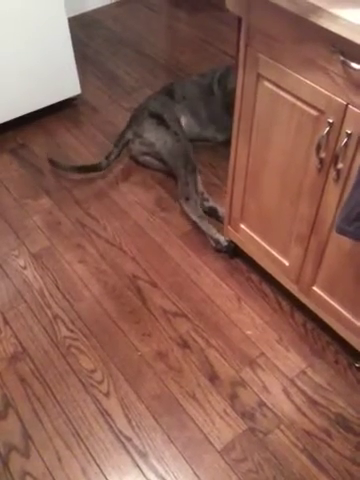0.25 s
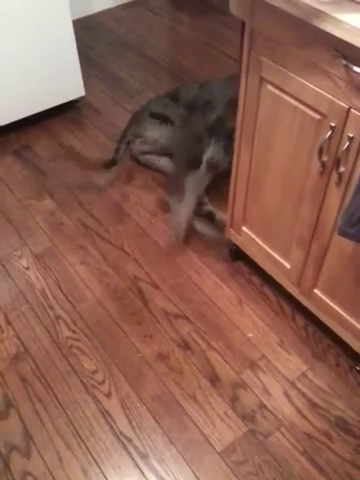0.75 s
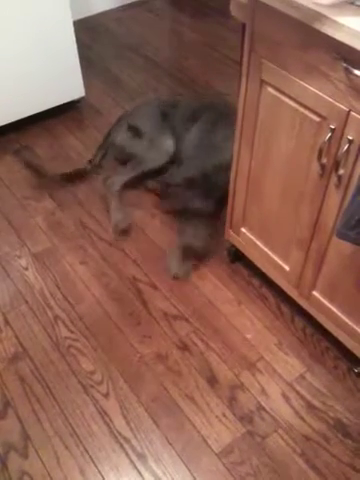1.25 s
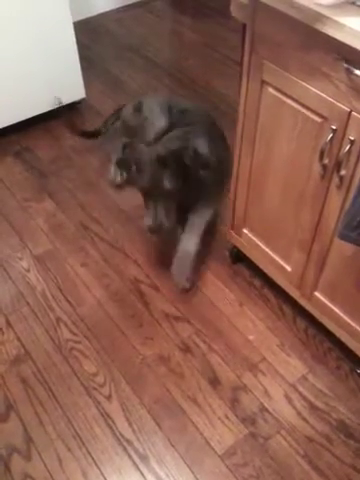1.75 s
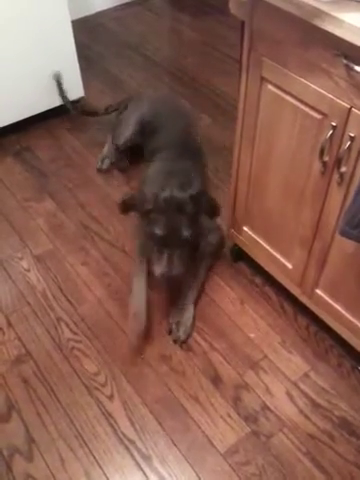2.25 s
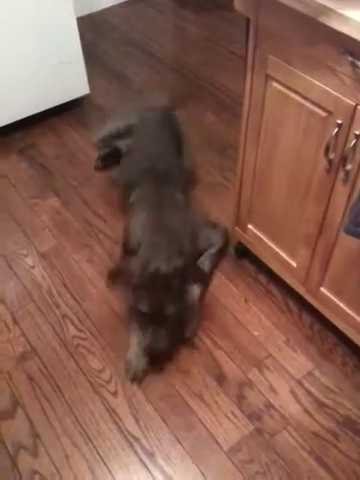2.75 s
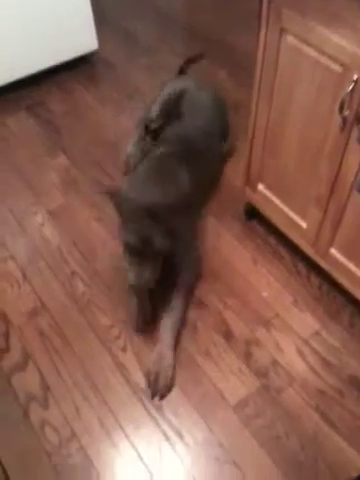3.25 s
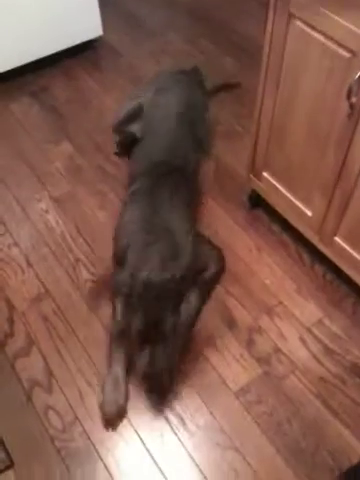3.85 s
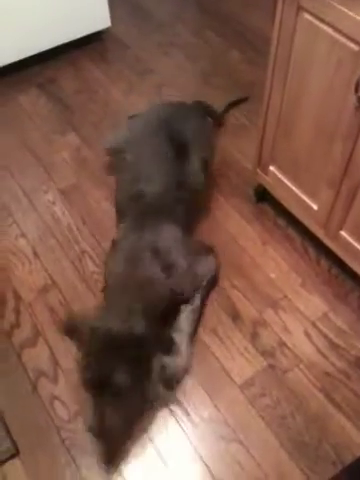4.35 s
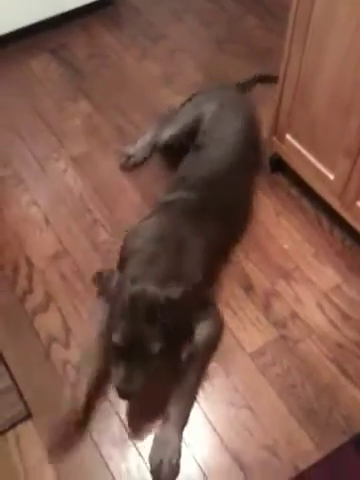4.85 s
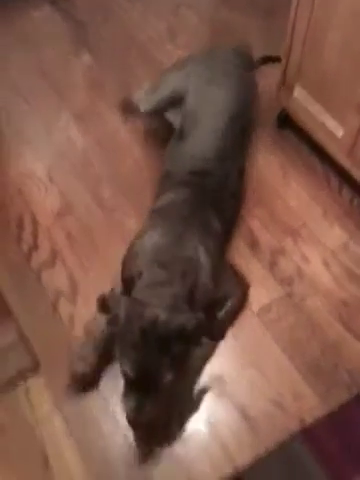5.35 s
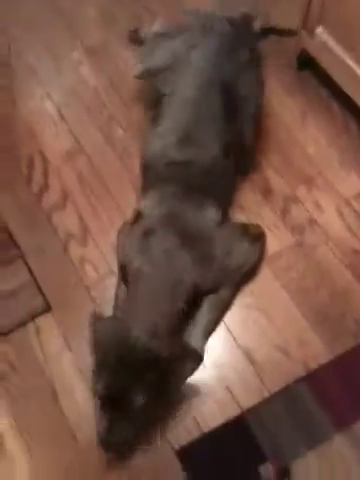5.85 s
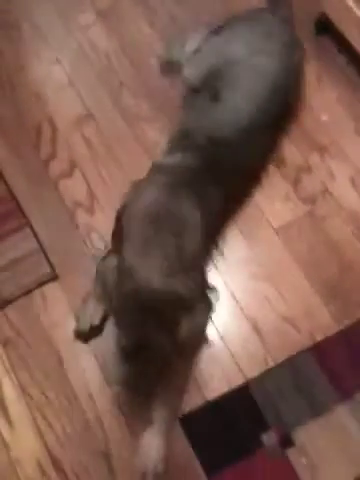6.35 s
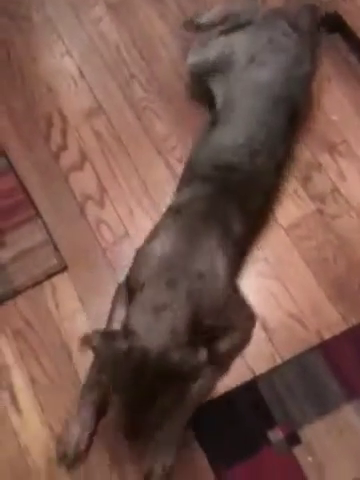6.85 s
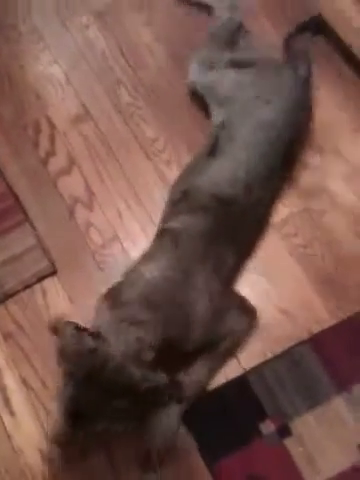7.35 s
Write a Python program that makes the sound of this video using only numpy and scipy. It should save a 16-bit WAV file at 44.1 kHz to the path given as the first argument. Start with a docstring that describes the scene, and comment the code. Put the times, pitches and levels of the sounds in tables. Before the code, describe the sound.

In a small hard-walled kitchen with a faint fan-like appliance hum, a large dog drags itself over hardwood. Soft rubs and a low thump lead to a rapid clatter of claws, a short lull, then bursts of scraping, hollow knocks and belly drags. One especially sharp claw crack lands around five seconds; lighter skids and rubbing follow. Mono, close small microphone, thin in the bass, with short room echoes.

```python
"""Dog crawling on a kitchen floor

A large dog crawls across hardwood boards in a small, hard-walled room, over the faint hum of an appliance.
Claws are brief chattering skids and snaps through board resonances; elbows and paws are damped low tones.
Coat and pads are coloured noise that swells with each stroke and pull, with gritty ticks from the grain.
Decaying noise answers contacts and sliding as the room; the appliance is fan noise and wavering tones."""
import sys
import numpy as np
from scipy import signal
from scipy.fft import rfft, irfft
from scipy.io import wavfile
from scipy.ndimage import uniform_filter1d

SR = 44100
rng = np.random.default_rng(int(sys.argv[2]) if len(sys.argv) > 2 else 0)


def log_audio(samples):
    """Write samples as a 16-bit WAV file to the path given in sys.argv[1]."""
    # one column per channel
    frames = np.atleast_2d(samples).T
    # limit to full scale, then quantise
    limited = np.clip(frames, -1, 1)
    pcm = np.round(limited * 32767).astype(np.int16)
    wavfile.write(sys.argv[1], SR, pcm)


N = 334719
TIME = np.arange(N) / SR


def undb(db):
    """Decibels to gain."""
    return 10 ** (np.asarray(db) / 20)


def unit(x):
    """Scale to rms 1."""
    return x / np.sqrt(np.mean(x ** 2))


def along(points, hz):
    """Read (Hz, value) points on a log-frequency axis."""
    f, value = np.transpose(points)
    return np.interp(np.log(np.maximum(hz, 1)), np.log(f), value)


def colour(x, points):
    """Give a sound a spectrum that falls away beyond its end points."""
    hz = np.maximum(np.fft.rfftfreq(len(x), 1 / SR), 1)
    below, above = hz / points[0][0], points[-1][0] / hz
    skirts = np.minimum(1, np.minimum(below, above)) ** 2
    return irfft(rfft(x) * undb(along(points, hz)) * skirts, len(x))


def causal(gain):
    """The most compact (minimum-phase) impulse response with this gain per frequency."""
    cepstrum = irfft(np.log(gain + 1e-9))
    half = len(cepstrum) // 2
    # fold the half before time zero onto the half after it
    cepstrum[1:half] *= 2
    cepstrum[half + 1:] = 0
    return irfft(np.exp(rfft(cepstrum)))


def walk(rate):
    """A smooth random wander with rms 1, heading for a new value `rate` times a second."""
    k = int(SR / rate)
    steps = np.repeat(rng.standard_normal(N // k + 1), k)
    return unit(uniform_filter1d(steps, k)[:N])


def add(out, s, x):
    """Mix a sound in at a time in seconds."""
    place = out[max(int(s * SR), 0):][:len(x)]
    place += x[:len(place)]


def kitchen(air_db=-58, waver_db=3.0, drift_rad=0.23):
    """An appliance runs: soft fan noise and a few low tones that waver in level and phase."""
    # Spectrum of the fan noise. Each row: frequency in Hz, relative density in dB.
    air_colour = [(30, -3), (80, -16), (140, -10), (180, -1), (400, 1), (600, -2.5), (800, -8), (1100, -14),
                  (1500, -11.5), (2550, -16.5), (3200, -26.5), (7500, -28.5), (10000, -31.5), (15800, -32)]
    # Tones of the hum. Each row: frequency in Hz, level in dB rms ahead of the waver and the microphone.
    hum_tones = [(100, -86), (120, -76), (198, -80), (247, -73), (298, -66), (351, -69)]
    air = unit(colour(rng.standard_normal(N), air_colour)) * undb(air_db)
    hum = np.zeros(N)
    for hz, db in hum_tones:
        level = undb(db + waver_db * walk(6.4))
        hum += level * np.sin(2 * np.pi * hz * TIME + drift_rad * walk(6))
    return air + np.sqrt(2) * hum  # a sine of peak sqrt(2) has rms 1


def room_tail(build_s, size=20000):
    """Diffuse echoes from one spot on the floor, energy 1; each band dies at its own pace."""
    # Reverberation of the room. Each row: frequency in Hz, time to fall by 60 dB in seconds.
    decay_times = [(200, 0.34), (800, 0.63), (2000, 0.58), (5000, 0.37), (14000, 0.39)]
    t, hz = TIME[:size], np.fft.rfftfreq(size, 1 / SR)
    noise, tail = rfft(rng.standard_normal(size)), 0
    for f, t60 in decay_times:
        # crossfading bands: 1 at this frequency, 0 at the others
        band = along([(g, float(g == f)) for g, _ in decay_times], hz)
        tail = tail + irfft(noise * band) * np.exp(-np.log(1000) * t / t60)
    tail = tail * (1 - np.exp(-t / build_s))
    return tail / np.linalg.norm(tail)


def swells(moves):
    """Each move speeds up and slows down in a bell shape; one envelope per level column."""
    centre, spread_s, *levels = np.transpose(moves)
    coarse = TIME[::64]
    bells = np.exp(-.5 * ((coarse - centre[:, None]) / spread_s[:, None]) ** 2)
    # overlapping moves add in power
    return [np.sqrt(np.interp(TIME, coarse, undb(db) ** 2 @ bells)) for db in levels]


def scratches(per_second=320, spread_db=1.5, grit_hz=3400, grit_db=7):
    """Claw tips trip over the wood grain: gritty ticks of uneven size, rms 1."""
    trips = rng.random(N) < per_second / SR
    grit = [(grit_hz / 3, -grit_db), (grit_hz, 0), (2 * grit_hz, -2 * grit_db)]
    return unit(colour(trips * undb(spread_db * rng.standard_normal(N)), grit))


def sliding(rub_db=-2, hiss_db=-0.5, drag_db=-2, grain_db=3, flutter_db=0.63, scratch_db=-7, wet_db=-4):
    """Each stroke swells and fades; hair and pads catch on the grain in countless tiny slips."""
    # A leg sweeps over the floor. Each row: time of the fastest point in seconds, spread of the bell
    # in seconds, pad rub in dB, coat hiss in dB; both levels ahead of the trims above.
    strokes = [(0.37, 0.052, -68, -77), (0.92, 0.02, -71, -68.5), (1.11, 0.039, -59, -64.5),
               (1.38, 0.069, -61.5, -67.5), (1.63, 0.072, -59, -66.5), (1.95, 0.011, -62, -78),
               (2.41, 0.025, -62, -89), (2.76, .08, -69, -76), (2.97, 0.047, -61.5, -75),
               (3.085, 0.026, -53, -57.5), (3.30, 0.021, -60, -63.5), (3.89, 0.0085, -60, -69),
               (4.00, 0.092, -68.5, -75), (4.17, 0.045, -53, -68.5), (4.51, 0.058, -55.5, -59),
               (4.68, 0.1, -61.5, -66.5), (5.27, 0.039, -63, -73), (5.42, 0.045, -61, -70.5),
               (5.80, 0.048, -57, -65), (6.15, 0.077, -62, -66), (6.33, 0.059, -63, -65),
               (6.55, 0.046, -61, -69), (6.88, .09, -65, -74), (7.48, 0.16, -62, -69.5)]
    # The dog hauls its belly forward. Each row: time of the fastest point in seconds, spread of the bell
    # in seconds, drag in dB ahead of its trim.
    pulls = [(0.92, 0.039, -61.5), (1.62, 0.32, -59.5), (2.41, 0.036, -60), (3.30, 0.026, -56),
             (4.18, 0.15, -56), (4.68, 0.052, -47), (5.30, .08, -62.5), (5.80, 0.12, -56.5),
             (6.14, 0.087, -50.5), (6.90, 0.75, -58.5)]
    # Spectra of pad rub, coat hiss and belly drag. Each row: frequency in Hz, relative density in dB.
    rub_colour = [(700, -12), (1200, -11), (1750, 0), (2600, -1.5), (3500, -13), (5000, -17.5), (7000, -22)]
    hiss_colour = [(3000, -24), (4500, -7), (5600, -3.5), (7400, 0.5), (9500, -7.5), (12500, -3),
                   (15800, -10.5)]
    drag_colour = [(150, -11.5), (300, 2.5), (450, 4), (800, 2.5), (1200, -5.5), (2000, -9.5)]
    rub, hiss, drag = swells(strokes) + swells(pulls)
    out = rub * undb(scratch_db) * scratches()
    layers = (rub, rub_colour, rub_db), (hiss, hiss_colour, hiss_db), (drag, drag_colour, drag_db)
    for swell, spectrum, db in layers:
        slips = rng.standard_normal(N) * undb(grain_db * walk(4000))
        out = out + swell * undb(db) * unit(colour(slips, spectrum))
    # the dog's weight presses unevenly
    out = out * undb(flutter_db * walk(35))
    echoes = signal.fftconvolve(out, room_tail(build_s=0.0013))[:N]
    return out + undb(wet_db) * echoes


def board_modes(hz, spacing_hz=170, depth_db=3.5, merge_hz=4000):
    """The floor's resonances plus those of one spot, in dB; the spot's own fade out in the treble."""
    # Resonances that the whole floor shares. Each row: frequency in Hz, width in Hz, height in dB.
    floor_modes = [(1580, 97, 3.5), (1773, 35, 6.5), (1980, 64, 5), (3810, 57, 0)]
    shared = sum(db / (1 + (2 * (hz - f) / width) ** 2) for f, width, db in floor_modes)
    knots = np.arange(160) * spacing_hz
    local = depth_db * np.interp(hz, knots, rng.standard_normal(len(knots)))
    return shared + local / (1 + (hz / merge_hz) ** 2)


def skid(skid_s, snap_db, size=1024):
    """A claw touches, chatters ever harder, snaps down and settles; energy 1."""
    u = TIME[:size] / max(skid_s, 1 / SR)  # the bite is hardest near u = 1
    envelope = (u ** 2 + 0.06) * np.exp(-2 * u)
    slips = rng.standard_normal(size) * envelope
    # the slips are so brief that they favour no pitch: flatten the spectrum, keep the phases
    slips = irfft(np.exp(1j * np.angle(rfft(slips)))) * envelope ** .25
    slips = slips / np.linalg.norm(slips)
    slips[np.argmax(envelope)] += undb(snap_db)
    return slips / np.linalg.norm(slips)


def toes(spread_s=0.022, toe_db=-16, count=3, size=2048):
    """The other claws of the paw follow the first, lightly and unevenly."""
    out = np.zeros(size)
    lags, chances = rng.uniform(.15, 1, count), rng.standard_normal(count)
    for lag, chance in zip(lags, chances):
        add(out, lag * spread_s, undb(toe_db + 2 * chance) * skid(skid_s=0.00089, snap_db=-0.23))
    return out


def judders(scatter_db=5, fade_db=3, count=7, edge_db=-8.5, mid_spot_hz=1350):
    """Stick and slip: each judder is a handful of uneven strikes that tend to weaken as the paw slows."""
    # A paw loses its grip and judders over the boards. Each row: start in seconds, length in seconds,
    # middle level in dB ahead of the claw gain, woody knock in dB.
    slides = [(1.488, 0.075, -38.5, -15.5), (1.643, .10, -34, -6.5), (3.188, 0.041, -48.5, 9.5),
              (4.446, .02, -46.5, 13), (4.688, .035, -47, 15), (5.801, 0.032, -40, -1),
              (6.153, 0.038, -42, -4.5), (6.90, .018, -52.5, 13), (7.464, 0.038, -52, -8)]
    strikes = []
    for s, length_s, db, knock_db in slides:
        for k, (late, force, spot) in enumerate(rng.random((count, 3))):
            part = (k + late) / count
            level_db = db + scatter_db * (force - .5) - fade_db * (part - .5)
            spot_hz = mid_spot_hz * 2 ** (spot - .5)
            strikes.append((s + length_s * part, level_db, knock_db, edge_db, spot_hz))
    return strikes


def claws(gain_db=23.0, knock_hz=1300, edge_hz=4800, low_hz=400, spot_db=5.0, spot_width_hz=260,
          ring_s=0.0064, ring_db=-7, room_db=-0.73, size=2048):
    """Each strike excites the hard board surface; a brief ring and the room's echoes follow, overlapping."""
    # Single claw strikes. Each row: time of the snap in seconds, level in dB ahead of the gain,
    # woody knock in dB, bright edge in dB, pitch of the struck spot in Hz.
    single_strikes = [ (0.863, -38, -9.5, -7, 1530), (1.250, -39.5, -8.5, -12, 2380),
                      (1.500, -33.5, -3, -12, 3260), (1.637, -30.5, -12.5, -5, 2380),
                      (1.644, -26, -4.5, -6.5, 2000), (1.677, -26, -10.5, -8.5, 1510),
                      (1.712, -27.5, -12.5, -21, 2650), (1.911, -29.5, -12.5, -1.5, 1720),
                      (1.923, -25, -2.5, -4, 3300), (1.965, -28, -16.5, -6, 1690),
                      (3.17, -36.5, 6.5, -20, 2200), (3.302, -28.5, -12.5, -4, 3600),
                      (3.338, -37.5, -4, -26, 1650), (3.450, -31.5, -6.5, -2, 1980),
                      (4.182, -35.5, -18, -7, 3640), (4.441, -26, -5, -33, 1810),
                      (4.631, -26, -18.5, -2, 2400), (4.652, -29.5, -14.5, -3, 1780),
                      (4.912, -37, 3.5, -9.5, 1380), (5.009, -40, 4.5, -3, 1000),
                      (5.023, -19.5, -12.5, -10.5, 2050), (5.184, -46, 2.5, -3, 1670),
                      (5.789, -29, -0.5, -14, 2170), (5.837, -27.5, -18, -9.5, 2180),
                      (6.016, -33, 0.5, -19, 1050), (6.109, -35, -15, -10, 2600),
                      (6.139, -31.5, -25, -13, 2720), (6.163, -31, -18, -10, 1770),
                      (6.168, -27, -14, -15, 2400), (6.287, -33, -12, -6, 1590),
                      (6.300, -34.5, -2, -4.5, 2250), (6.698, -43.5, 3, -10, 2170),
                      (6.828, -30.5, -9.5, -12.5, 2090), (6.897, -38.5, 12, -19, 1080),
                      (7.250, -42, -1.5, -6.5, 1490), (7.450, -32, -1.5, -8.5, 1250),
                      (7.500, -39.5, -7, -1, 2320)]
    # Spectrum of claw on wood. Each row: frequency in Hz, relative density in dB.
    claw_colour = [(500, 5), (1100, -2), (1350, -1.5), (1700, -2), (2050, -4.5), (2450, 0), (3100, -5),
                   (3900, -6), (5200, -10.5), (7300, -7.5), (10000, -17.5), (12500, -15.5), (15800, -27)]
    base_skid_s, base_snap_db = .0029, -6.5  # chatter before the snap, and the snap against the chatter
    skid_doubling_db = 24  # a woodier contact is softer: this much more knock doubles the skid
    # above this level the snap grows, and the sound that trails it shrinks, by so many dB per dB of excess
    hard_blow_db, snap_per_db, dry_per_db = -23.5, 4.2, 1.1
    out, hz = np.zeros(N), np.fft.rfftfreq(size, 1 / SR) + 1
    low = 1 / (1 + (hz / knock_hz) ** 6)
    high = 1 / (1 + (edge_hz / hz) ** 6)
    board_db = along(claw_colour, hz)
    for s, db, knock_db, edge_db, spot_hz in single_strikes + judders():
        skid_s = base_skid_s * 2 ** (knock_db / skid_doubling_db)
        contact_db = low * knock_db + high * edge_db
        modes_db = board_modes(hz) + spot_db / (1 + ((hz - spot_hz) / spot_width_hz) ** 2)
        tick = causal(undb(board_db + contact_db + modes_db) / (1 + (low_hz / hz) ** 2))
        path = undb(room_db) * room_tail(build_s=0.00095)
        ring = rng.standard_normal(size) * np.exp(-TIME[:size] / ring_s)
        add(path, skid_s, undb(ring_db) * ring / np.linalg.norm(ring))
        add(path, skid_s, toes())
        # a hard blow cracks and stands out from all that trails it
        excess_db = max(db - hard_blow_db, 0)
        path = path * undb(-dry_per_db * excess_db)
        add(path, 0, skid(skid_s, base_snap_db + snap_per_db * excess_db))
        add(out, s - skid_s, undb(db + gain_db) * signal.fftconvolve(path, tick))
    return out


def thumps(upper_ratio=1.887, upper_db=-13, joist_hz=178, joist_db=-19, joist_s=0.058, wet_db=-5, size=5000):
    """A soft, heavy contact flexes the boards for a few damped cycles; the joists below ring on."""
    # Elbows and paws landing. Each row: start in seconds, level of the main flex in dB, board pitch in Hz.
    landings = [(0.861, -27.5, 274), (0.887, -40, 270), (1.302, -47, 184), (1.909, -33, 207),
                (1.946, -31, 205), (1.960, -33, 295), (2.513, -29.5, 251), (2.532, -36, 188),
                (2.713, -39.5, 300), (3.213, -37, 199), (3.291, -33, 199), (4.437, -33, 332),
                (4.605, -34.5, 225), (4.655, -29.5, 285), (4.916, -45, 202), (5.011, -33, 415),
                (5.836, -44, 315), (6.157, -35.5, 420), (6.184, -39, 208), (6.896, -45, 256),
                (7.487, -46.5, 238)]
    swell_cycles = 0.71  # a soft contact loads the board slowly: the push peaks after twice this many cycles
    settle_s, settle_db = .023, -10  # the rest of the limb comes down just after
    out, t = np.zeros(N), TIME[:size]
    joist = undb(joist_db) * np.sin(2 * np.pi * joist_hz * t) * np.exp(-t / joist_s)
    for s, db, hz in landings:
        u, phase = t * hz / swell_cycles, 2 * np.pi * hz * t
        push = u ** 2 * np.exp(-u)
        tones = np.sin(phase) + undb(upper_db) * np.sin(upper_ratio * phase)
        flex = undb(db) * push / push.max() * tones
        add(out, s, flex + undb(db) * joist * (1 - np.exp(-u)))
        add(out, s + settle_s, undb(settle_db) * flex)
        add(out, s, undb(wet_db) * signal.fftconvolve(flex, room_tail(build_s=0.0032)))
    return out


def scene():
    """The dog and the room, in mono."""
    return (kitchen() + sliding() + claws() + thumps())[None]


def record(dry, bass_hz=105, top_hz=15850):
    """A small microphone loses the deep bass; the recorder cuts the top."""
    thin = signal.sosfilt(signal.butter(3, bass_hz, "high", fs=SR, output="sos"), dry)
    return signal.sosfilt(signal.ellip(10, .2, 70, top_hz, fs=SR, output="sos"), thin)


dry = scene()
out = record(dry)
log_audio(out)
```